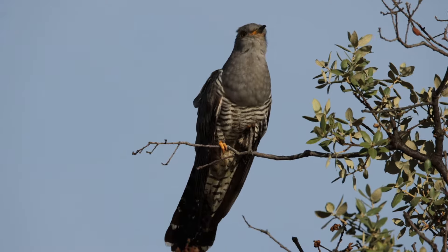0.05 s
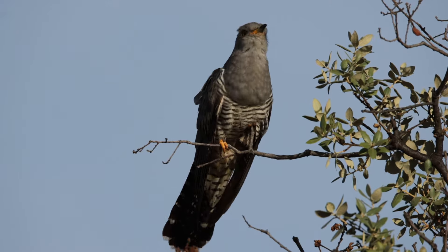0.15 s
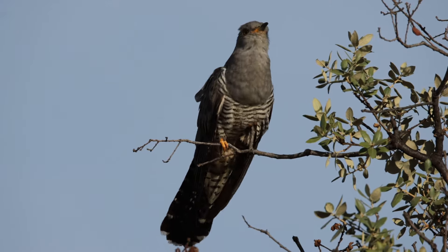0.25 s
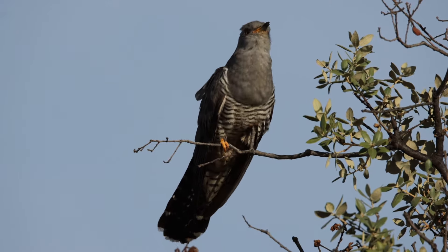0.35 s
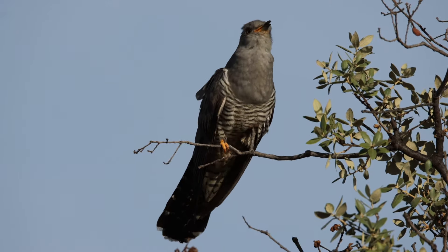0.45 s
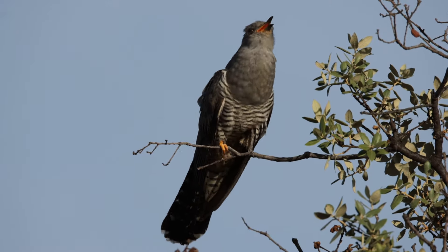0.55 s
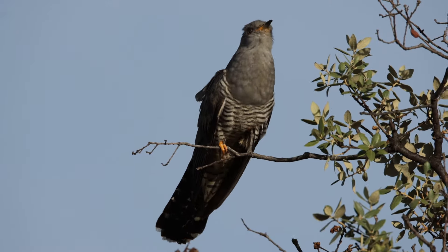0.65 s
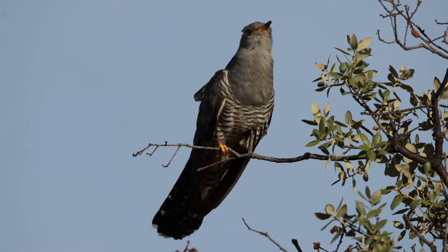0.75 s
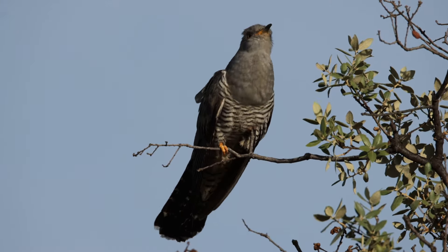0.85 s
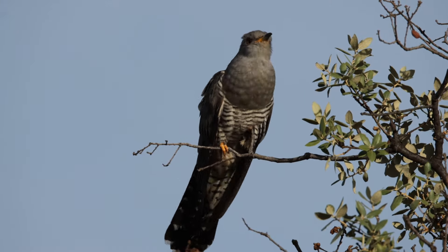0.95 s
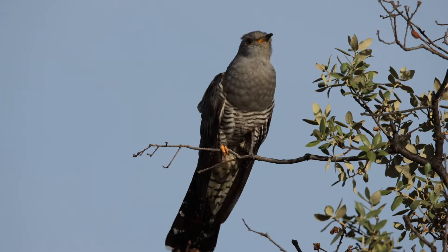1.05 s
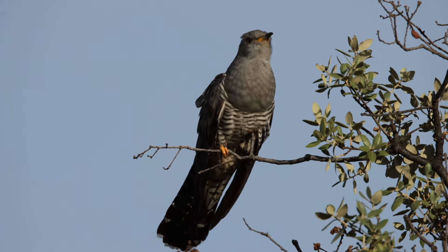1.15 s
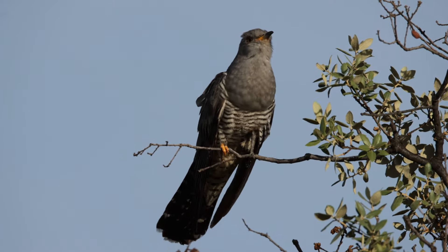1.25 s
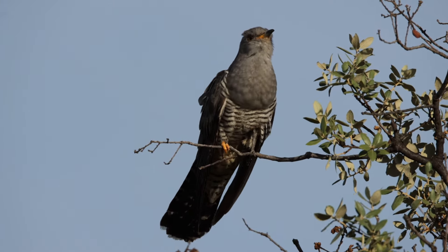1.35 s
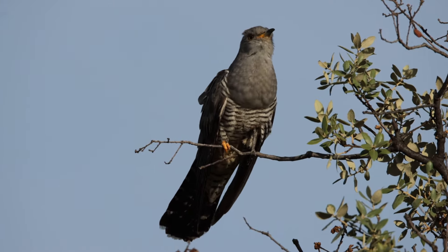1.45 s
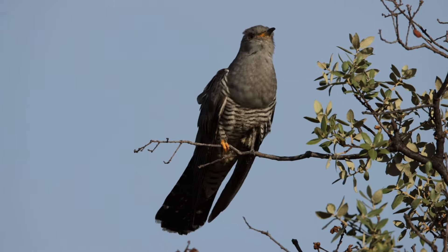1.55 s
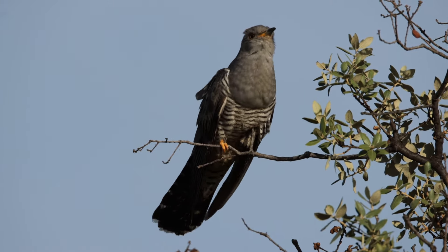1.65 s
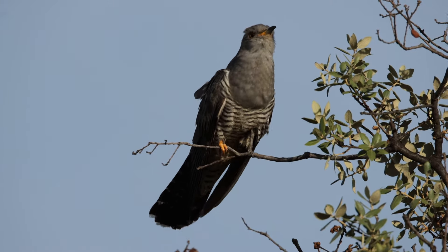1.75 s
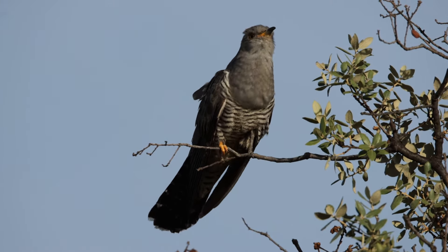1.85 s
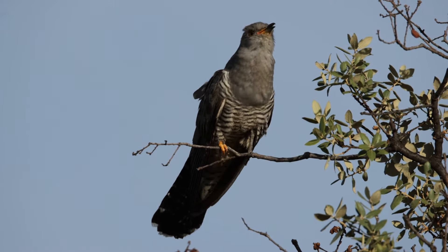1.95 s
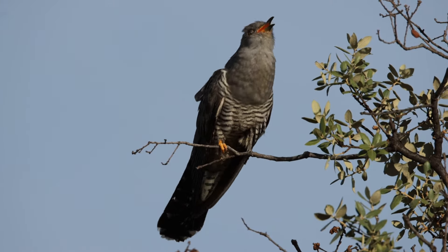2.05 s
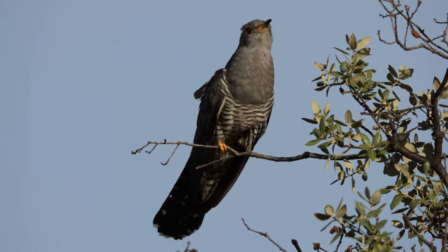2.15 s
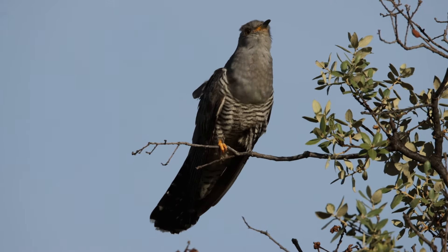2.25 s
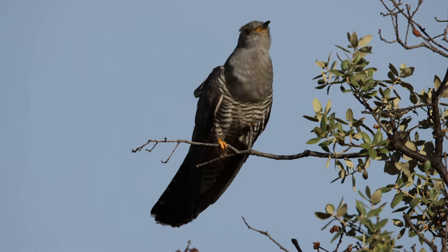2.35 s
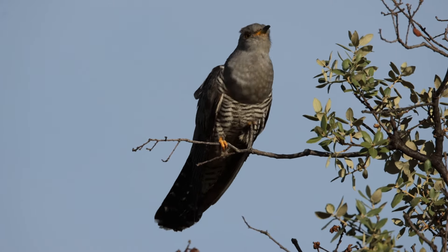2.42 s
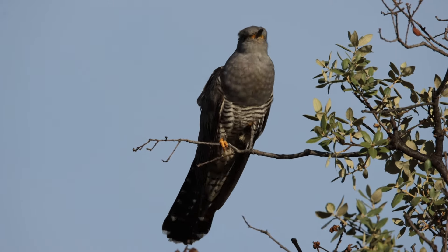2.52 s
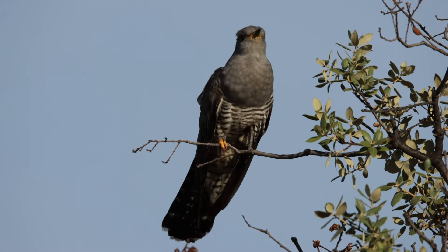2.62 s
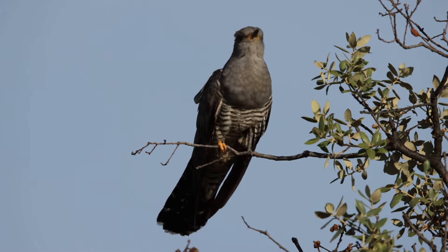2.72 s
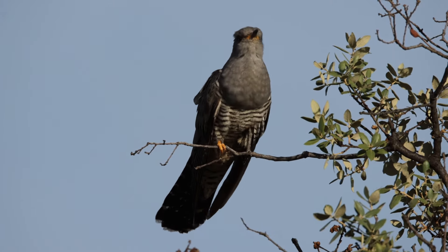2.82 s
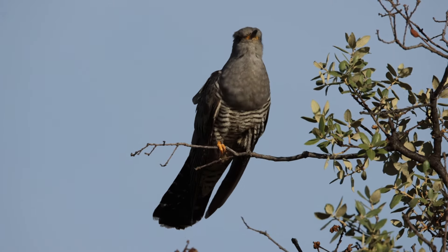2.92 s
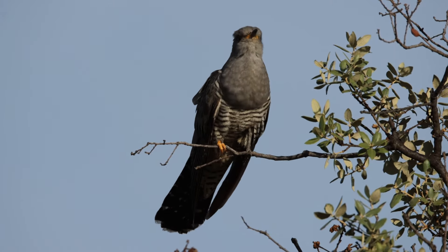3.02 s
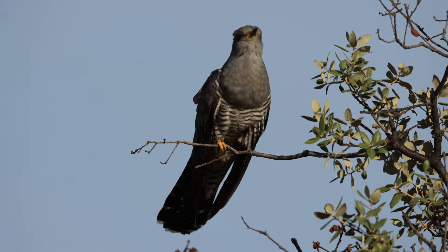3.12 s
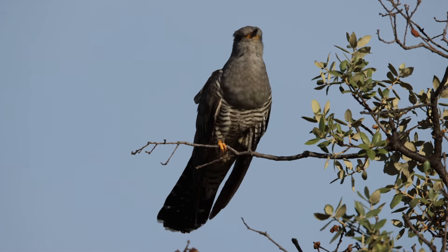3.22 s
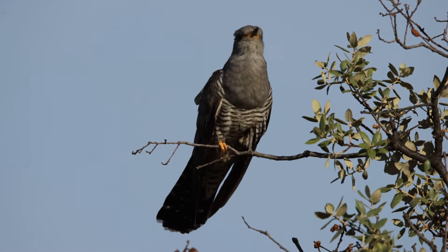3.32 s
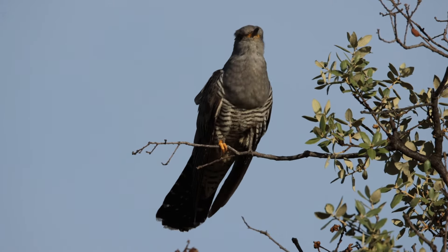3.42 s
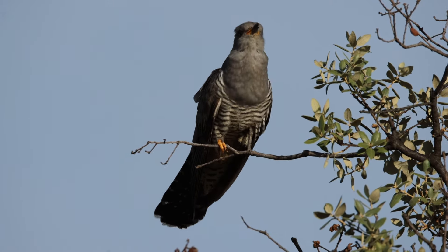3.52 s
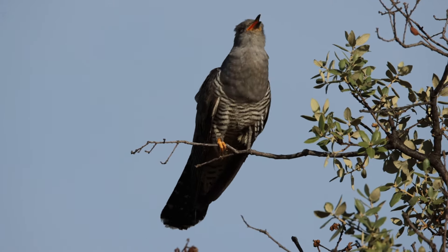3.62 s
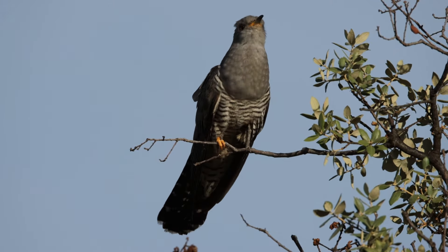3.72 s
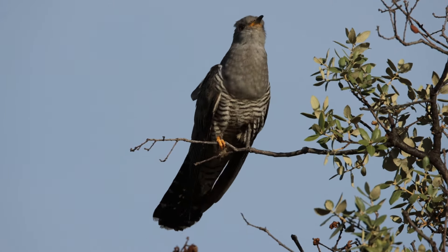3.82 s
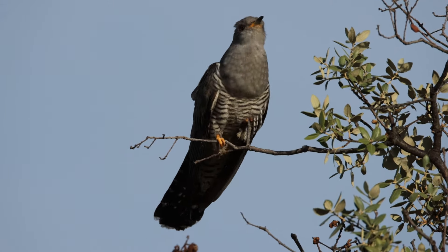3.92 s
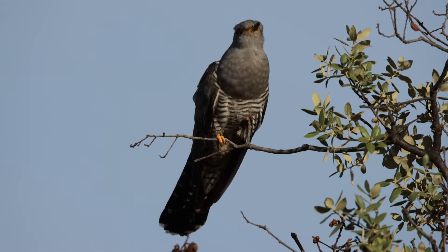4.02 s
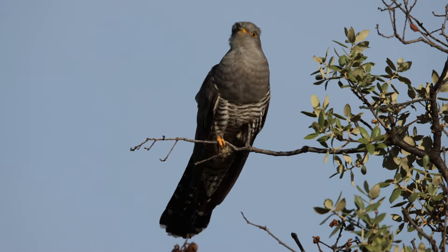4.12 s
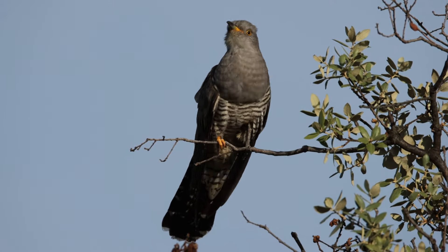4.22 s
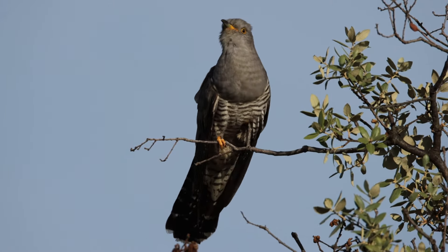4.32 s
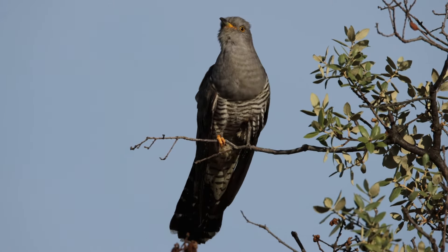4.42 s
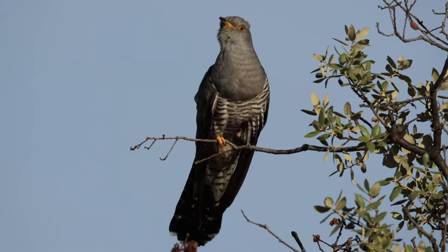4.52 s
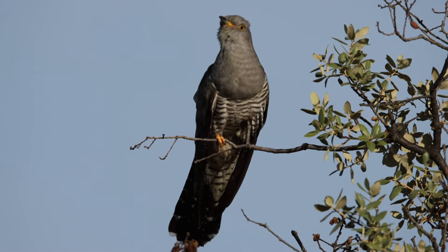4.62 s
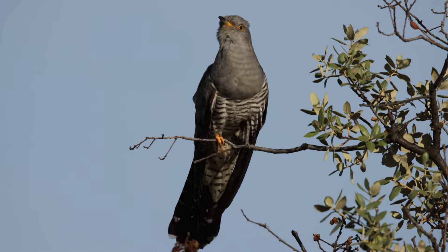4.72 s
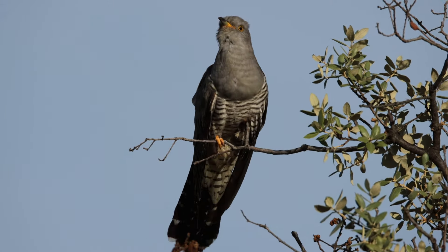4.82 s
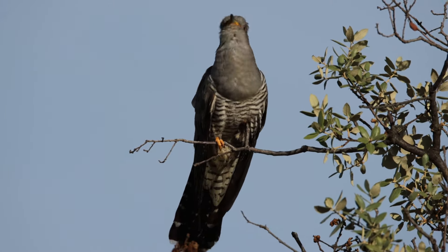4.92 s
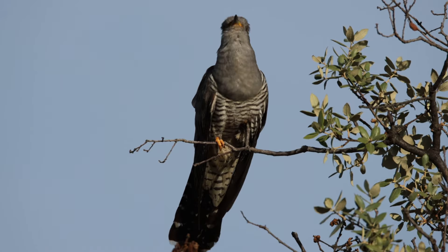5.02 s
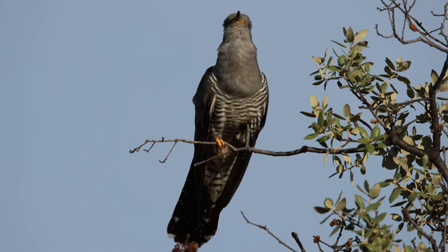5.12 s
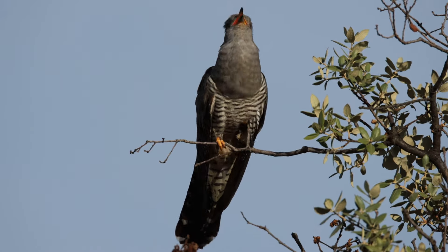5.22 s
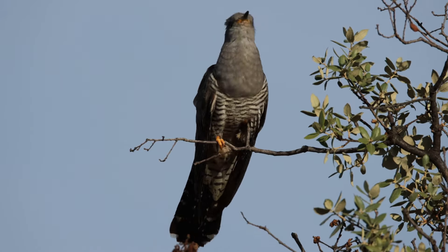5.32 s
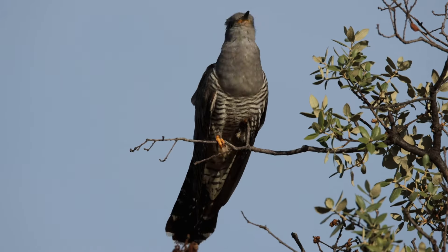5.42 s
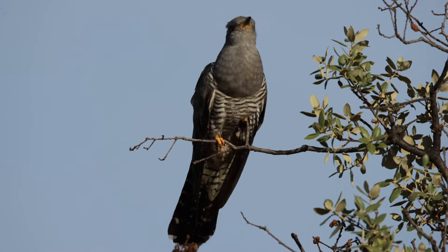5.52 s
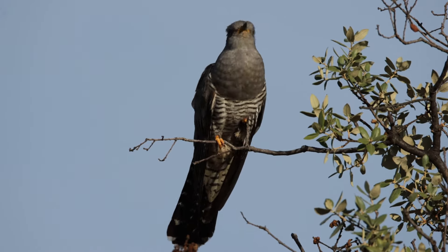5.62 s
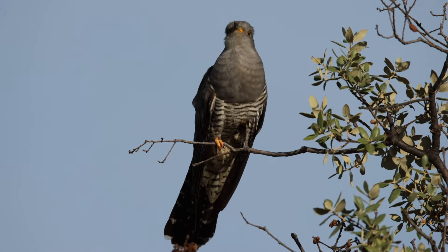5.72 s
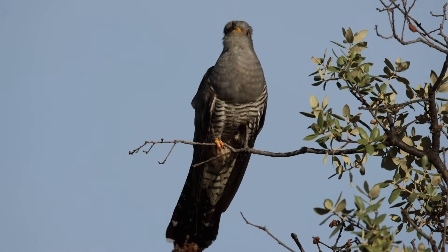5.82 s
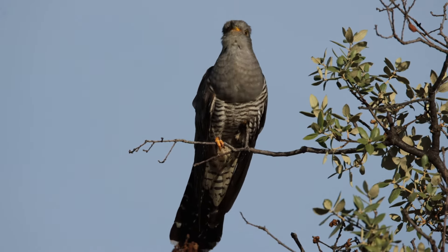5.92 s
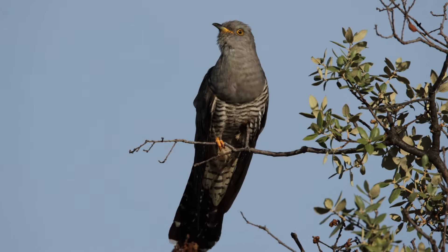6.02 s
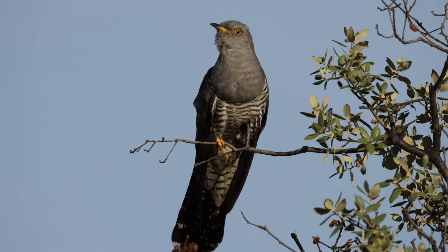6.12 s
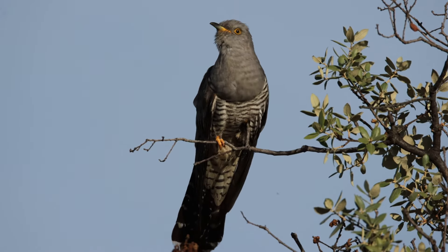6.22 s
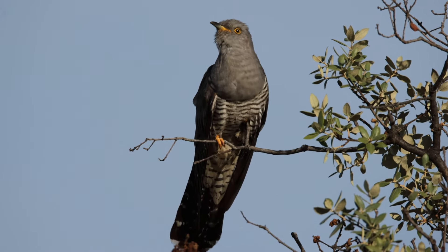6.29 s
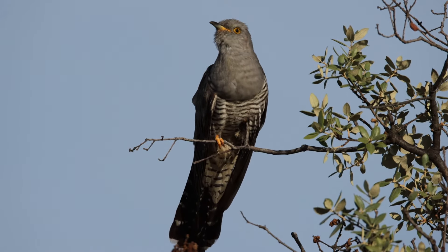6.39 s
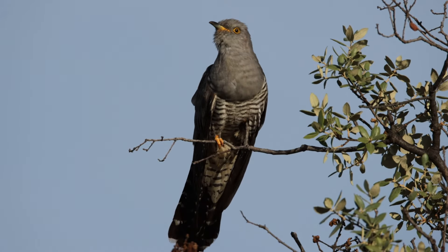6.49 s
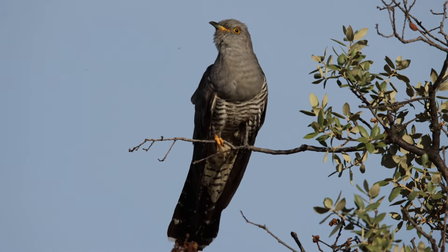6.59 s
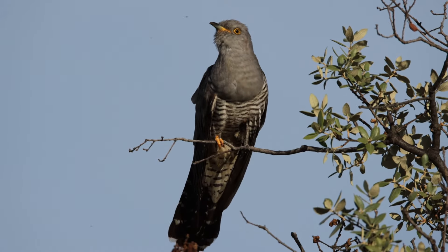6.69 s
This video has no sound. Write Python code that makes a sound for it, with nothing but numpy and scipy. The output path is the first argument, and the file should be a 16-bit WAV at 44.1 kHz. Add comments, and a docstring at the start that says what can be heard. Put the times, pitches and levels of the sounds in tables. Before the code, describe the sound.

A quiet, open countryside heard through two microphones, with a thin steady hiss throughout. From about 0.2 to 1.5 seconds wind buffets mostly the left side in low, lumpy thuds, strongest near 1 second, while a few thin bird pips sound far off. A nearby cuckoo, roughly centred, calls at 0.6, 2.1, 3.7 and 5.3 seconds: a short, arching higher note, then about a third of a second later a slightly longer, level note some four semitones lower. Both are smooth, hollow and nearly pure, with weak echoes from trees and ground. A dull far rumble swells after 2.2 seconds, fading by 3.6, and returns softly from 5.5. Sparse faint pips occur near 2.9, 4.0 and 4.7 seconds. Slight wind stirs around 4 and 6.3 seconds. One faint low blip falls between the last call's notes, near 5.4 seconds. After the last call, only hiss, rumble and light wind remain.

```python
"""Open country, two microphones: a steady hiss lies under everything, wind buffets mostly the left one at first,
made of shaped noise and vortex pulses; a low noise rumble swells and sinks; small birds pip far off as sine glides.
Through all this a cuckoo on a nearby branch sings its two-note call four times: each note is a nearly pure tone
with faint overtones and a trace of air, and trees and ground return a weak echo.
Fainter wind comes back in places, and one low, two-partial blip sounds near the last call."""
import sys
import numpy as np
from scipy import signal
from scipy.fft import rfft, irfft, next_fast_len
from scipy.io import wavfile
from scipy.ndimage import uniform_filter1d

SR = 44100
rng = np.random.default_rng(int(sys.argv[2]) if len(sys.argv) > 2 else 0)


def log_audio(samples):
    """Write samples as a 16-bit WAV file to the path given in sys.argv[1]."""
    # one column per channel
    frames = np.atleast_2d(samples).T
    # limit to full scale, then quantise
    limited = np.clip(frames, -1, 1)
    pcm = np.round(limited * 32767).astype(np.int16)
    wavfile.write(sys.argv[1], SR, pcm)


N = 297661
TIME = np.arange(N) / SR

# The cuckoo's first, higher notes. Each row: start in seconds, length in seconds,
# level in dB before its swell, pitch in Hz where the opening scoop ends.
CUCK_NOTES = [(0.6263, 0.113, -13.9, 707.5), (2.1356, 0.1144, -14.6, 702), (3.6975, 0.1125, -14.7, 703.5),
              (5.2718, 0.1114, -15.2, 705)]


def amp(db):
    """Decibels to gain."""
    return 10 ** (np.asarray(db) / 20)


def evened(x):
    """Scales to rms 1."""
    return x / np.sqrt(np.mean(x ** 2) + 1e-20)


def read(points, hz):
    """Reads a table of (Hz, value) along a log-frequency axis."""
    f, value = np.transpose(points)
    return np.interp(np.log(hz + 1), np.log(f + 1), value)


def add(mix, s, sound):
    """Mixes a sound in at s seconds."""
    part = mix[..., max(round(s * SR), 0):][..., :sound.shape[-1]]
    part += sound[..., :part.shape[-1]]


def ease(u):
    """A quarter sine from 0 to 1 as u goes from 0 to 1."""
    return np.sin(np.pi / 2 * np.clip(u, 0, 1))


def drift(rate_hz):
    """Smooth random wandering of rms 1, its spectrum falling off as a Gaussian past the rate."""
    size = next_fast_len(N, True)
    hz = np.fft.rfftfreq(size, 1 / SR)
    spectrum = rfft(rng.standard_normal(size)) * np.exp(-(hz / rate_hz) ** 2)
    return evened(irfft(spectrum, size)[:N])


def smooth_noise(length, size):
    """Random wavering of rms 1, averaged twice over size samples."""
    once = uniform_filter1d(rng.standard_normal(length), size)
    return evened(uniform_filter1d(once, size))


def noise(colour, likeness):
    """Two partly alike channels of coloured noise; their mean has rms 1."""
    size = next_fast_len(N, True)
    hz = np.fft.rfftfreq(size, 1 / SR)
    a, b = rfft(rng.standard_normal((2, size))) * amp(read(colour, hz))
    same = np.clip(read(likeness, hz), -1, 1)
    right = same * a + np.sqrt(1 - same ** 2) * b
    pair = irfft(np.array([a, right]), size)[:, :N]
    return pair / pair.mean(0).std()


def swells(rows, edge_s, rest_db):
    """Gain at every sample: each swell rises, grows or fades steadily, and sinks back to the resting level."""
    power = amp(rest_db) ** 2
    for s, length, db, growth in rows:
        t = np.clip(TIME - s, 0, length)
        edges = (ease(t / edge_s) * ease((length - t) / edge_s)) ** 2
        power = power + (amp(db + growth * t) * edges) ** 2
    return np.sqrt(power)


def still_air(level_db=-62):
    """The steady hiss of still air: coloured noise, much alike at both microphones only in the bass."""
    # Each row: frequency in Hz, relative density in dB per Hz.
    hiss_colour = [(15, -36.5), (25, -7), (133, -4.5), (210, -4.5), (400, -3.5), (470, -5), (599, -9.5),
                   (704, -8), (1240, -13), (2010, -13), (5160, -17.5), (10700, -24), (12200, -23),
                   (14000, -27), (15500, -37.5)]
    # Each row: frequency in Hz, left-right likeness from 0 to 1.
    hiss_likeness = [(60, 0.9), (300, 0.43), (1000, .45), (3000, 0.076), (12000, 0.091)]
    return amp(level_db) * noise(hiss_colour, hiss_likeness)


def eddy(hz):
    """One push and pull of pressure as a vortex passes; its spectrum peaks at hz."""
    u = 2 * np.pi * hz * np.arange(-SR // 50, SR // 50) / SR
    return -u * np.exp((1 - u ** 2) / 2)


def wind(rush_db=-5, lumps_db=3, swirl_db=-6, swirls_per_s=30, core_db=-15, right_db=-17.5, surge_db=3.0, surge_hz=9):
    """Lumpy turbulence, many small eddies and a few large ones, mostly on the left microphone."""
    # The rush. Each row: frequency in Hz, relative density in dB per Hz.
    rush_colour = [(20, -13.5), (40, 1.5), (70, 3.5), (120, -0.5), (180, -6.5), (270, -17.5), (400, -26.5),
                   (600, -44), (1200, -72.5)]
    # Small eddies. Each row: centre in Hz, relative size in dB; swirls_per_s strike at each centre.
    small_eddies = [(80, 12.5), (120, 1.5), (180, -4.5), (270, -10)]
    # Gusts. Each row: start in seconds, length in seconds, level in dB before the closing gain, growth in dB per s.
    gusts = [(0.15, 0.64, -37.5, -2), (0.81, 0.714, -34.5, -7), (1.45, 0.87, -52.5, -4),
             (3.93, 0.3, -58, 1.5), (6.2, 0.31, -52, 0)]
    # The largest eddies. Each row: middle in seconds, peak in dB before core and closing gain, centre in Hz.
    large_eddies = [(0.249, -32.5, 112), (0.376, -31.5, 129), (0.49, -31.5, 138), (0.526, -29, 106),
                    (0.59, -27.5, 120.7), (0.661, -23.5, 95), (0.769, -27, 84), (0.999, -17, 143),
                    (1.036, -24, 125.6), (1.128, -25.5, 110), (1.226, -27, 86), (1.44, -33, 115),
                    (4.087, -41.5, 94.8), (4.519, -49.5, 74.8), (4.769, -49, 80), (6.359, -39.5, 63.4)]

    rush = evened(amp(lumps_db * drift(25))) * noise(rush_colour, [(60, 0.39), (300, .2)])
    swirls = 0
    for hz, db in small_eddies:
        hits = (2 * rng.random(N) - 1) * (rng.random(N) < swirls_per_s / SR)
        swirls = swirls + amp(db) * signal.oaconvolve(hits, eddy(hz), "same")
    gust_gain = swells(gusts, edge_s=.08, rest_db=-70)  # a slight breeze is left between gusts
    strength = gust_gain * evened(amp(surge_db * drift(surge_hz)))
    out = strength * (amp(rush_db) * rush + amp(swirl_db) * evened(swirls))
    for s, db, hz in large_eddies:
        push = eddy(hz) + amp(core_db) * eddy(1.7 * hz)  # a tight core sharpens each large eddy
        add(out, s - len(push) / 2 / SR, amp(db) * push)
    return out * amp([[4], [4 + right_db]])  # closing gain, left and right


def rumble():
    """A dull, far rumble of coloured noise that swells and sinks unevenly."""
    # Each row: start in seconds, length in seconds, level in dB before the lean to the left, growth in dB per s.
    rumble_swells = [(2.2, 1.41, -50.5, -6), (5.55, 0.34, -54, 0.5), (5.76, 1.25, -55, 3)]
    # Each row: frequency in Hz, relative density in dB per Hz.
    rumble_colour = [(50, -31.5), (120, -6), (195, -12.5), (255, 1), (305, -3), (360, 1.5), (425, 0.5),
                     (490, -11), (600, -12), (780, -15.5), (1000, -20), (1600, -19.5), (3000, -40.5),
                     (6000, -49.5)]
    gain = swells(rumble_swells, edge_s=0.22, rest_db=-75.5) * amp(1.3 * drift(5.7))
    lean_left = amp([[.7], [-.7]])
    return gain * noise(rumble_colour, [(300, 0.9), (1500, 0.46)]) * lean_left


def trees(x, echo_db=-31, gap=0.017):
    """Leaves and ground scatter a short tail after a gap in seconds, different at each microphone."""
    # Each row: frequency in Hz, time in seconds to fade by 60 dB.
    fade_times = [(500, .24), (700, .3), (2000, .22), (10000, .12)]
    # Each row: frequency in Hz, relative level in dB at the tail's start.
    tail_colour = [(540, -2), (620, -4), (700, 3), (2000, 0), (10000, -2)]
    t = np.arange(SR // 2) / SR
    struck = rng.random((2, len(t))) < 2000 / SR  # about 2000 reflections a second
    taps = rng.standard_normal((2, len(t))) * struck * (t > gap)
    hz, when, z = signal.stft(taps, SR, nperseg=256)
    fade_db = read(tail_colour, hz)[:, None] - 60 * when / read(fade_times, hz)[:, None]
    tail = signal.istft(z * amp(fade_db), SR, nperseg=256)[1]
    tail /= np.linalg.norm(tail, axis=1, keepdims=True)
    return amp(echo_db) * signal.fftconvolve(x, tail, axes=1)[:, :N]


def small_birds(waver=.008):
    """Short, thin, wavering whistles from far off: gliding sines with a tail from the trees."""
    # Each row: start in seconds, length in seconds, level in dB without echo, start and end of the glide in Hz.
    pips = [(0.305, 0.041, -65, 2330, 2326), (.375, 0.04, -65, 2310, 2350),
            (0.428, 0.039, -61.5, 2335, 2345), (.502, 0.021, -58, 2335, 2314),
            (.51, .04, -63.5, 2054, 2030), (1.134, 0.04, -61, 1890, 1725), (2.9, 0.056, -66, 2350, 2370),
            (2.977, 0.03, -70, 2270, 2340), (4.033, 0.03, -58.5, 1730, 1798), (4.672, .07, -68, 4210, 4410)]
    out = np.zeros(N)
    for s, length, db, start_hz, end_hz in pips:
        hz = np.linspace(start_hz, end_hz, round(length * SR))
        hz *= 1 + waver * smooth_noise(SR, size=100)[:len(hz)]
        whistle = np.sin(2 * np.pi * np.cumsum(hz) / SR)
        add(out, s, amp(db) * signal.windows.tukey(len(hz), .7) * whistle)
    pair = np.array([out, out])
    return pair + trees(pair, echo_db=-7)


def throat(modes, valley_db, hz, top_hz=13800):
    """Gain of the resonances at each microphone, over a level valley; nothing passes far above the top."""
    power = amp(valley_db) ** 2
    for centre, width, *sides_db in modes:
        power = power + (amp(sides_db)[:, None] / (1 + (2 * (hz - centre) / width) ** 2)) ** 2
    return np.sqrt(power) / (1 + (hz / top_hz) ** 40)


def course(rows, attack_s, release_s, swell_at_s, swell_s, swell_db, scoop_hz, scoop_s, sag_hz_per_s,
           drop_hz, drop_s, reed_in_s, reed_out_s):
    """Loudness, pitch and reediness: each note swells once; its pitch scoops up, sags and drops at the end."""
    controls = np.zeros((3, N))
    for s, length, db, top_hz in rows:
        t = np.arange(1, length * SR) / SR
        left = length - t  # seconds still to sing
        swell = amp(swell_db * np.exp(-((t - swell_at_s) / swell_s) ** 2))
        loudness = ease(t / attack_s) ** 1.5 * swell * np.tanh(left / release_s)
        scoop, drop = np.maximum([1 - t / scoop_s, 1 - left / drop_s], 0) ** 1.5
        pitch = top_hz - scoop_hz * scoop - sag_hz_per_s * (t - scoop_s) - drop_hz * drop
        buzz = ease(t / reed_in_s) * ease(left / reed_out_s) ** 2  # the overtones come and go at their own pace
        add(controls, s, np.array([amp(db) * loudness, pitch, amp(db) * buzz]))
    return controls


def notes(rows, shape, modes, valley_db, air_db, flutter_db, vary_db=1.17, jitter=0.0023, pan_db=0.42):
    """The syrinx swings almost as a sine; weak overtones and a little air pass through the resonances."""
    # The bird at the two microphones. Each row: frequency in Hz, phase in radians by which left leads right.
    left_lead = [(520, -.39), (740, -.33), (1050, -2.2), (1450, -2), (2100, .9), (4200, -.8), (5000, -1.5),
                 (14000, -1.5)]
    controls = course(rows, **shape)
    on = controls[0] > 1e-6  # only the samples where the bird sings
    (loudness, pitch, buzz), count = controls[:, on], on.sum()
    pitch = pitch * (1 + jitter * smooth_noise(count, size=300))
    phase = 2 * np.pi * np.cumsum(pitch) / SR

    def partial(k):
        """The k-th harmonic at each microphone."""
        return np.sin(k * phase + read(left_lead, k * pitch) * np.array([[.5], [-.5]]))

    overtones = 0
    for k in range(2, 25):
        fast, slow = smooth_noise(count, size=500), smooth_noise(count, size=3000)
        flutter = amp(flutter_db * fast + vary_db * slow)
        overtones = overtones + flutter * throat(modes, valley_db, k * pitch) * partial(k)
    size = next_fast_len(count)
    resonance = throat(modes, valley_db, np.fft.rfftfreq(size, 1 / SR))
    breath = irfft(rfft(rng.standard_normal((2, size))) * resonance, size)[:, :count]
    tone = loudness * partial(1) * amp([[-pan_db], [pan_db]])
    out = np.zeros((2, N))
    out[:, on] = tone + buzz * (overtones + amp(air_db) * breath)
    return out


def onset_bursts(burst_db=-42.5):
    """A brief, soft burst of coloured noise at the onset of each "cuck"."""
    bursts = sum(np.exp(-((TIME - row[0] + .001) / .005) ** 2) for row in CUCK_NOTES)
    # Each row: frequency in Hz, relative density in dB per Hz.
    burst_colour = [(300, -22.5), (600, 4), (800, 0.5), (1200, -21),
                    (3300, -34.5), (4500, -23), (6000, -36), (8000, -44)]
    return amp(burst_db) * bursts * noise(burst_colour, [(1000, 0.96)])


def far_echo(x, delay_s=.092, echo_db=-43):
    """A far line of trees returns the call once, faintly."""
    return amp(echo_db) * np.array([np.interp(TIME - delay_s, TIME, side, left=0) for side in x])


def cuckoo():
    """The higher, brighter "cuck", then the longer "oo", with echoes near and far."""
    # The lower notes. Each row: start in seconds, length in seconds, level in dB before its swell,
    # pitch in Hz where the opening scoop ends.
    oo_notes = [(0.9833, 0.1714, -15, 547.5), (2.4917, 0.1693, -15.1, 547.4),
                (4.0542, 0.1697, -15.2, 546.5), (5.6283, 0.1707, -15.4, 546.6)]
    # How each note is sung: times in s, swell in dB, pitch moves in Hz, sag in Hz per s.
    # The "cuck" is a high arch, the "oo" nearly level.
    cuck_shape = dict(attack_s=.041, release_s=.0123, swell_at_s=.102, swell_s=.014, swell_db=2.9, scoop_hz=226, scoop_s=.0367, sag_hz_per_s=240, drop_hz=126, drop_s=.043, reed_in_s=.024, reed_out_s=.027)
    oo_shape = dict(attack_s=.0354, release_s=.028, swell_at_s=.05, swell_s=.014, swell_db=1.2, scoop_hz=34, scoop_s=.03, sag_hz_per_s=90, drop_hz=40, drop_s=.02, reed_in_s=.036, reed_out_s=.016)
    # Resonances that colour the overtones. Each row: centre in Hz, width in Hz,
    # gain in dB at the left and at the right microphone.
    cuck_modes = [(1153, 280, -31, -23.5), (2130, 420, -41.5, -41), (3340, 540, -54, -50.5),
                  (4183, 370, -39, -56.5), (4690, 480, -35, -40), (5580, 350, -47, -42.5),
                  (6290, 400, -43, -40), (8220, 480, -36, -37), (10200, 620, -44.5, -44.5),
                  (11980, 480, -50.5, -51.5), (13150, 360, -40, -42.5)]
    oo_modes = [(1150, 210, -55, -31), (1566, 200, -51.5, -44.5), (2090, 300, -43.5, -47.5),
                (2680, 250, -54.5, -56), (3210, 520, -54, -46.5), (3583, 400, -40.5, -51.5),
                (5305, 300, -49, -48)]
    cuck = notes(CUCK_NOTES, cuck_shape, cuck_modes, valley_db=-59, air_db=-1.5, flutter_db=3.0, pan_db=0.0)
    oo = notes(oo_notes, oo_shape, oo_modes, valley_db=-85.5, air_db=-1.5, flutter_db=1.46, pan_db=0.8)
    song = cuck + oo + onset_bursts()
    return song + far_echo(song) + trees(song, echo_db=-39)


def low_blip(start_s=5.435, length_s=0.096, db=-55, rest_hz=158, fall_hz=55, fall_s=.012, fundamental_db=-4):
    """One faint, low blip of two harmonics that slides down and settles."""
    t = np.maximum(TIME - start_s, 0)
    phase = 2 * np.pi * np.cumsum(rest_hz + fall_hz * np.exp(-t / fall_s)) / SR
    envelope = ease(t / fall_s) * ease(1 - t / length_s)
    return amp(db) * envelope * (amp(fundamental_db) * np.sin(phase) + np.sin(2 * phase))


def scene():
    """A steady hiss, wind, rumble and far birds around the cuckoo, and one low blip."""
    return still_air() + wind() + rumble() + small_birds() + cuckoo() + low_blip()


def record(dry, low_cut_hz=42, edge_hz=15700):
    """The microphones lose the deepest bass; then the recorder's band limit cuts the highest treble."""
    bass_cut = signal.butter(2, low_cut_hz, "highpass", fs=SR, output="sos")
    thinned = signal.sosfilt(bass_cut, dry)
    band_limit = signal.firwin(511, edge_hz, window=("kaiser", 9), fs=SR)
    return signal.oaconvolve(thinned, band_limit[None], "same")


dry = scene()
out = record(dry)
log_audio(out)
```